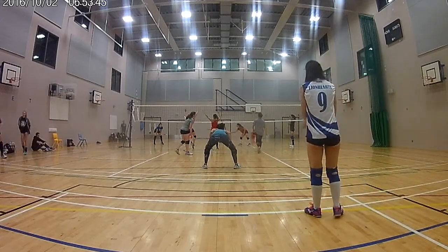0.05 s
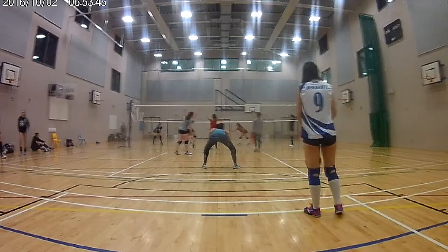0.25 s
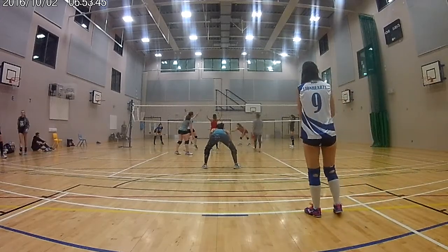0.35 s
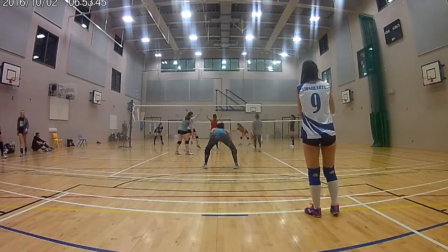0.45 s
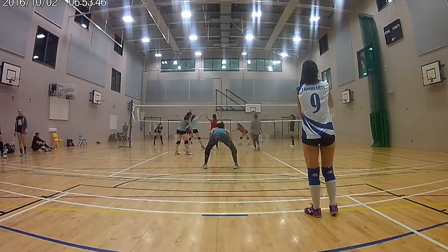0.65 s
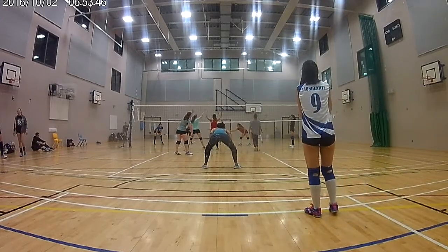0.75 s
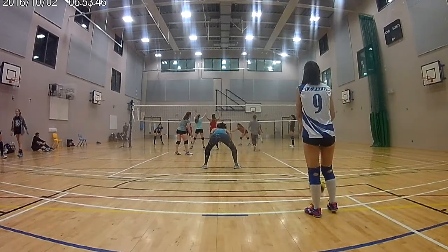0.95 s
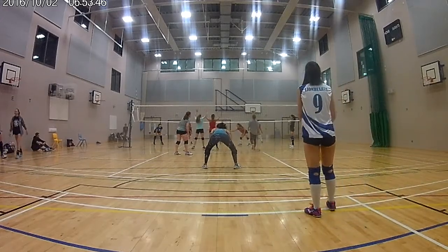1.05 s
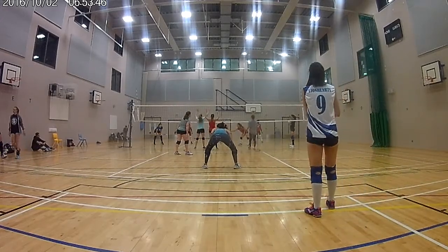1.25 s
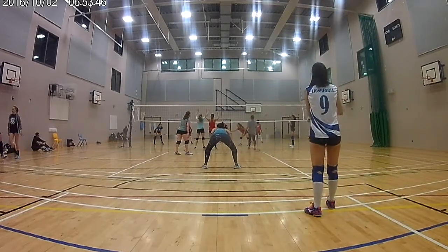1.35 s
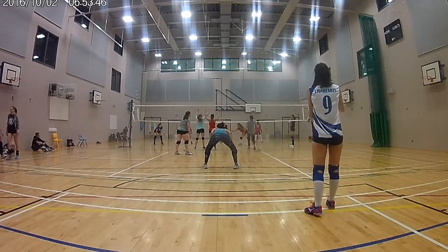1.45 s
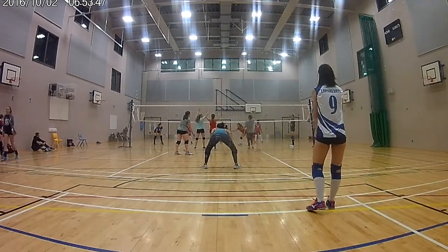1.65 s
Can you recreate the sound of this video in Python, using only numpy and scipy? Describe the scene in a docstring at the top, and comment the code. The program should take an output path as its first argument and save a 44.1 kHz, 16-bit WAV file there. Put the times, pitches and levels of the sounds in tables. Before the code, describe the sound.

A ball dribbled by hand booms on wooden boards, ringing around a large hall.

```python
"""A floor boom fades under the ventilation of a large sports hall, and a palm slaps a volleyball.
The ball is dribbled on sprung wood, close to a low microphone: three slaps, two bounces between them.
It smacks the boards and knocks hollowly, and the floor booms in its deep modes.
A faint high hiss rises and falls with the boom.
The near walls throw each hit back, the hall rings on, and a shoe squeaks once, faintly."""
import sys
import numpy as np
from scipy import signal
from scipy.fft import rfft, irfft, next_fast_len
from scipy.io import wavfile
from scipy.ndimage import uniform_filter1d

SR = 44100
rng = np.random.default_rng(int(sys.argv[2]) if len(sys.argv) > 2 else 0)


def wav_record(signal):
    """Record a signal, one row per channel, as 16-bit PCM in the file named by sys.argv[1]."""
    frames = np.transpose(np.atleast_2d(signal))
    bounded = np.clip(frames, -1, 1)
    # unit amplitude maps onto the largest positive 16-bit level
    quanta = np.round(bounded * 32767).astype(np.int16)
    wavfile.write(sys.argv[1], SR, quanta)


N = 74970


def amp(db):
    return 10 ** (np.asarray(db) / 20)


def unit_rms(x):
    return x / np.sqrt(np.mean(x ** 2) + 1e-20)


def along(points, hz):
    """Read a curve of (Hz, value) points on a log frequency axis."""
    point_hz, values = np.transpose(points)
    return np.interp(np.log(hz + 1), np.log(point_hz + 1), values)


def since(start):
    """Seconds since start, zero before it."""
    return np.maximum(np.arange(N) / SR - start, 0)


def strike(t, attack, t60):
    """A rise and an exponential fall, all times in seconds."""
    return (1 - np.exp(-t / attack)) * np.exp(-np.log(1000) * t / t60)


def filtered(x, response):
    """Shape x by a gain that depends on frequency in Hz."""
    size = next_fast_len(N + SR // 2)
    return irfft(rfft(x, size) * response(np.fft.rfftfreq(size, 1 / SR)), size)[:N]


def noise(colour):
    """Noise of rms 1, coloured by (Hz, dB) points."""
    return unit_rms(filtered(rng.standard_normal(N), lambda hz: amp(along(colour, hz))))


def contact(colour, start, rough, t60):
    """Two surfaces meet: a coloured snap and a short rough trail, with the energy of 5 ms at rms 1."""
    size = next_fast_len(N + SR // 2)
    hz = np.fft.rfftfreq(size, 1 / SR)
    cepstrum = irfft(np.log(amp(along(colour, hz))), size)
    # minimum phase keeps the onset sharp
    snap = np.exp(rfft(2 * cepstrum[1:size // 2], size) * np.exp(-2j * np.pi * hz / SR))
    trail = rng.standard_normal(N) * strike(since(start), attack=0.00086, t60=t60)
    push = rough * unit_rms(trail) / np.sqrt(N)
    push[int(start * SR) + SR // 2000] += 1
    return unit_rms(filtered(push, lambda f: snap)) * np.sqrt(0.005 * SR / N)


# Room tone of the hall, all around the microphone. Each row: frequency in Hz, relative level in dB.
VENTILATION_COLOUR = [(15, -48), (25, 3), (131, 6.5), (169, -9.5), (291, -14.5), (906, -22), (1410, -21),
                      (2180, -30.5), (2420, -29.5), (3660, -32), (4500, -35), (6620, -35.5), (7940, -43),
                      (10500, -38.5), (12000, -43), (15600, -80), (22000, -120)]

def ventilation(level_db=-44.5):
    """Moving air fills the hall with a steady low rush."""
    return amp(level_db) * noise(VENTILATION_COLOUR)


# The ball lands near the microphone; the first bounce, before time zero, is heard only as a fading boom.
# Each row: start in seconds, relative smack level in dB, relative boom level in dB.
BOUNCES = [(-.45, -23, 4.5), (0.1887, -29, 0), (0.9597, -29, -0.9)]
# Modes of the whole sprung floor under the microphone, then of its single planks.
# Each row: frequency in Hz, relative level in dB, t60 in seconds, swell time in seconds.
FLOOR_MODES = [(44.2, -17.7, 0.67, 0.0043), (65.08, -12.5, 1.13, 0.022), (75.8, -4.5, 0.23, 0.002),
               (78.55, 7, 0.404, 0.13), (97.96, -4.05, 0.612, 0.068), (100.37, -3.5, 0.51, 0.017),
               (117.3, 1.5, 0.37, 0.14), (125.1, -20.5, 0.88, 0.027), (138.2, -30, 1.04, 0.074),
               (157.1, 2.5, 0.06, 0.0042), (179.44, -0.15, 0.09, 0.00555), (205.6, -23, 0.41, 0.0018),
               (203.3, -8.5, 0.047, 0.0026)]
PLANK_MODES = [(300, -4.5, 0.17, 0.069), (341.5, -50, 0.16, 0.0058), (343.3, -49, 0.57, 0.0029),
               (413.8, -15, 0.18, 0.067)]

def floor_boom(travel_at_100hz_s=0.01583, drop_db=11, drop_after_s=0.35, drop_s=0.015):
    """Bending waves spread through the floor, the high ones first; each mode swells and dies."""
    boom = np.zeros(N)
    for start, _, boom_db in BOUNCES:
        drop = np.minimum(since(start + drop_after_s) / drop_s, 1)  # the ring falls away suddenly
        level = amp(boom_db - drop_db * drop)
        for hz, db, t60, swell in [*FLOOR_MODES, *PLANK_MODES]:
            t = since(start + travel_at_100hz_s * np.sqrt(100 / hz))
            envelope = (1 - np.exp(-t / swell)) * strike(t, swell, t60)
            boom += level * amp(db) * envelope * np.sin(2 * np.pi * hz * t)
    return boom


# Tone of the hiss heard with the boom. Each row: frequency in Hz, relative level in dB.
HISS_COLOUR = [(500, 15.5), (2500, 4), (5000, -12), (7000, -0.5), (11000, 0.5), (13000, 3)]

def boom_hiss(boom, gain_db=-44, growth=0.7):
    """A faint high hiss that rises and falls with the boom."""
    boom_rms = np.sqrt(np.abs(uniform_filter1d(boom ** 2, size=300)))
    return amp(gain_db) * noise(HISS_COLOUR) * boom_rms ** growth


# The palm on the ball, close to the microphone. Each row: start in seconds, crack level in dB,
# treble gain in dB, thump level in dB, hall send relative to the crack in dB,
# pitch of the cupped palm's pop in Hz, pop relative to the crack in dB.
SLAPS = [(0.047, -38, -13, -34.5, 4, 1001, 8), (0.8038, -33, -0.5, -40.5, -1.5, 1356, -8),
         (1.656, -33, -11.5, -38.5, 0.5, 754, 11.5)]
# The crack at the microphone, the crack as it spreads into the hall, and the ball's hollow thump.
# Each row: frequency in Hz, relative level in dB.
CRACK_COLOUR = [(150, -8.5), (400, 1), (600, -5), (730, -12.5), (860, -5), (1080, -12.5), (1350, 2.5),
                (1600, -11), (2100, -5), (2600, -21), (3200, -8.5), (3650, 1.5), (4400, -13.5), (5200, -24),
                (6600, -18), (8000, -38), (12000, -37)]
SPREAD_COLOUR = [(150, -2), (400, -5.5), (700, -10.5), (1000, -2), (1400, -2), (1700, -6.5), (2150, -1.5),
                 (2600, -16.5), (3100, -3), (3700, -1.5), (4400, -16), (5300, -23), (6600, -14.5),
                 (8000, -29), (12000, -41)]
THUMP_COLOUR = [(40, -30), (100, 4.5), (160, -2.5), (240, -5), (310, -1.5), (420, -15), (700, -36.5),
                (2000, -55)]

def palm_slaps(treble_hz=2600, pop_width_hz=70, hall_treble_share=0.57):
    """The palm cracks and pops on the ball, which thumps hollowly; the treble of the crack differs from slap to
    slap."""
    crack, crack_to_hall, thump = np.zeros((3, N))
    for start, db, treble_db, thump_db, send_db, pop_hz, pop_db in SLAPS:
        def pop(hz):
            damping = 1j * hz * pop_width_hz
            return 1 + amp(pop_db) * damping / (pop_hz ** 2 - hz ** 2 + damping)

        def treble(hz):
            return amp(treble_db / (1 + (treble_hz / (hz + 1)) ** 6))

        direct = contact(CRACK_COLOUR, start, rough=1.13, t60=0.056)
        crack += amp(db) * filtered(direct, lambda hz: pop(hz) * treble(hz))
        spread = contact(SPREAD_COLOUR, start, rough=0.65, t60=0.025)
        spread = filtered(spread, lambda hz: pop(hz) * treble(hz) ** hall_treble_share)
        crack_to_hall += amp(db + send_db) * spread
        thump += amp(thump_db) * noise(THUMP_COLOUR) * strike(since(start), attack=0.0025, t60=0.57)
    return crack, crack_to_hall, thump


# Echoes off the walls nearest the microphone.
# Each row: base delay in seconds, relative level in dB, t60 of the scatter in seconds.
WALL_ECHOES = [(.024, -11.5, 0.028), (0.0364, -5.5, 0.053), (.043, -4.5, 0.14), (.095, -12.5, 0.068)]
# The ring of the hall beyond them. Each row: frequency in Hz, t60 in seconds.
HALL_DECAY = [(100, 1.52), (400, 2.04), (1400, 2.04), (3700, 1.34), (6000, 1.35), (11000, 0.26)]
# Tone of echoes and ring together. Each row: frequency in Hz, relative level in dB.
HALL_COLOUR = [(50, 1), (150, 2), (350, -5.5), (600, -5.5), (1000, -2.5), (1400, 3), (2000, 0.5),
               (3000, -4), (3700, -1.5), (5000, 9), (6500, -11.5), (12000, 4)]

def hall(sound, wall_lag_s, walls_db, tail_db=-2.5, tail_delay_s=0.034, tail_build_s=0.02):
    """The near walls scatter the sound back, then comes a long tail whose treble dies first."""
    hz, t, spectra = signal.stft(rng.standard_normal(N), SR, nperseg=256)
    decay = np.exp(-np.log(1000) * t / along(HALL_DECAY, hz)[:, None])
    tail = signal.istft(spectra * decay, SR, nperseg=256)[1][:N]
    build = 1 - np.exp(-since(tail_delay_s) / tail_build_s)
    response = amp(tail_db) * unit_rms(tail * build)
    for delay, db, t60 in WALL_ECHOES:
        scatter = rng.standard_normal(N) * strike(since(delay + wall_lag_s), attack=0.00033, t60=t60)
        response += amp(db + walls_db) * unit_rms(scatter)
    response = filtered(response / np.sqrt(N), lambda f: amp(along(HALL_COLOUR, f)))
    return signal.fftconvolve(sound, response)[:N]


# Ball on wood, at close range. Each row: frequency in Hz, relative level in dB.
SMACK_COLOUR = [(150, 6.5), (400, -3), (550, -1.5), (750, -9.5), (1000, 2.5), (1250, -2.5), (1500, -1),
                (1750, -3.5), (2050, -1), (2700, -22), (3200, -11.5), (3680, -1), (4700, -27),
                (5400, -25.5), (6500, -16.5), (7600, -43), (12000, -35.5)]

def ball_smacks(rough):
    """The ball's skin meets the varnished boards."""
    return sum(amp(db) * contact(SMACK_COLOUR, start, rough, t60=0.022)
               for start, db, _ in BOUNCES if start > 0)


# The boards just below the microphone. Each row: frequency in Hz, relative level in dB.
SHUDDER_COLOUR = [(100, -95), (170, 9), (210, 4), (235, 2.5), (270, -7.5), (310, 1), (360, 1), (400, -4.5),
                  (500, -13), (750, -25), (1000, -15), (2500, -40.5)]

def plank_shudder(gain_db=-22):
    """The many higher modes of the planks shudder briefly after each bounce."""
    return sum(amp(gain_db + db) * noise(SHUDDER_COLOUR) * strike(since(start), attack=0.032, t60=0.38)
               for start, _, db in BOUNCES)


# Modes of the ball, heard from floor height.
# Each row: frequency in Hz, level relative to the boom in dB, t60 in seconds.
BALL_MODES = [(332, -12.5, 0.061), (370, -33, 0.13)]

def ball_knock(lag_s=0.0025):
    """The squashed ball knocks hollowly just after the smack."""
    knock = np.zeros(N)
    for start, _, boom_db in BOUNCES:
        t = since(start + lag_s)
        for hz, db, t60 in BALL_MODES:
            knock += amp(boom_db + db) * strike(t, attack=0.0094, t60=t60) * np.sin(2 * np.pi * hz * t)
    return knock


def plank_clatter(gain_db=-32, lag_s=0.0324):
    """The planks around the microphone knock as the main wave passes under them."""
    colour = [(200, -11), (400, 4.5), (580, 0), (800, 3),
              (1100, -17), (2500, -15), (4000, -15), (8000, -60)]
    return sum(amp(gain_db + db) * noise(colour) * strike(since(start + lag_s), attack=0.0022, t60=0.12)
               for start, _, db in BOUNCES)


# A shoe near the microphone. Each row: start in seconds, pitch in Hz, level in dB, length in seconds.
SQUEAKS = [(1.473, 3740, -55.5, 0.016)]

def shoe_squeak(relative_width=0.088):
    """A sole chirps faintly on the varnish, in a narrow band."""
    squeak = np.zeros(N)
    for start, hz, db, length in SQUEAKS:
        band = filtered(rng.standard_normal(N), lambda f: np.exp(-((f / hz - 1) / relative_width) ** 2))
        envelope = np.sin(np.pi * np.minimum(since(start) / length, 1))
        squeak += amp(db) * unit_rms(band) * envelope
    return squeak


def scene():
    """Ball and floor close to the microphone, the hall and its ventilation around them."""
    crack, crack_to_hall, thump = palm_slaps()
    boom = floor_boom()
    knocks = plank_shudder() + ball_knock() + plank_clatter()
    smacks = amp(1.5) * ball_smacks(rough=2.07)
    near = crack + thump + smacks + boom + knocks + shoe_squeak() + boom_hiss(boom)
    palm_to_hall = crack_to_hall + amp(-12) * thump
    floor_to_hall = amp(-5) * ball_smacks(rough=0.38) + amp(-29) * boom + amp(-15) * knocks
    echoes = hall(palm_to_hall, wall_lag_s=0.001, walls_db=0.3)
    echoes += hall(floor_to_hall, wall_lag_s=0.0036, walls_db=4.0)
    return (near + echoes + ventilation())[None]


def record(dry, low_cut_hz=31, top_hz=12080):
    """One microphone, low over the floor: it loses the deepest bass and all above its band limit."""
    return filtered(dry[0], lambda hz: (hz < top_hz) / (1 + (low_cut_hz / (hz + 1)) ** 6))[None]


dry = scene()
out = record(dry)
wav_record(out)
```